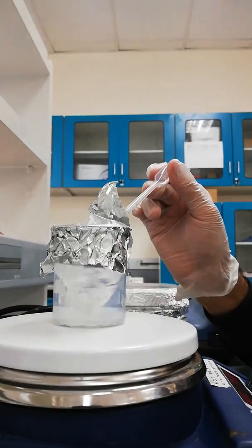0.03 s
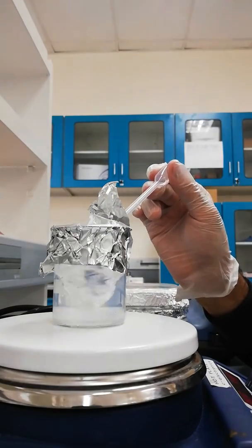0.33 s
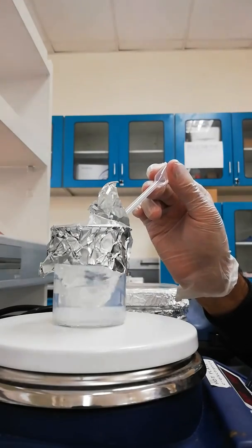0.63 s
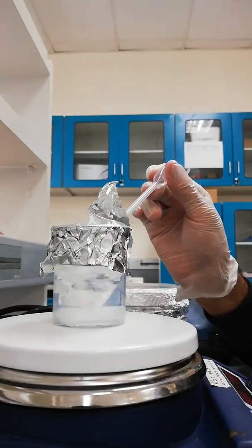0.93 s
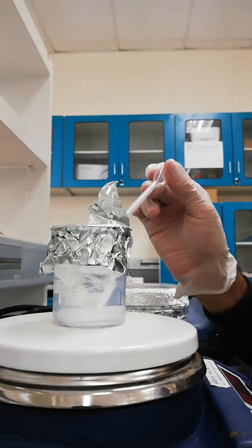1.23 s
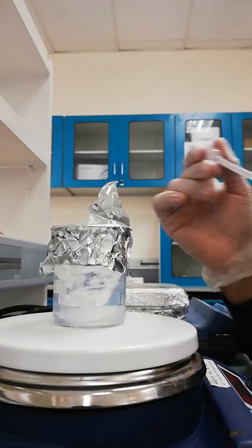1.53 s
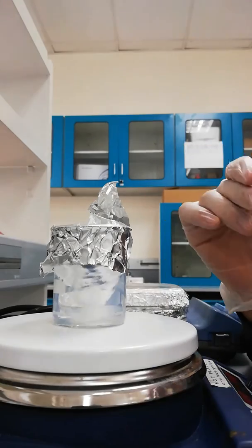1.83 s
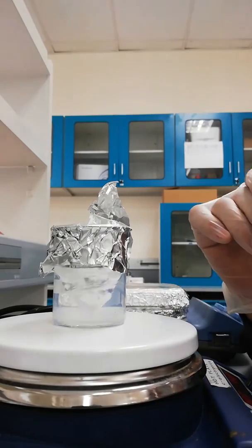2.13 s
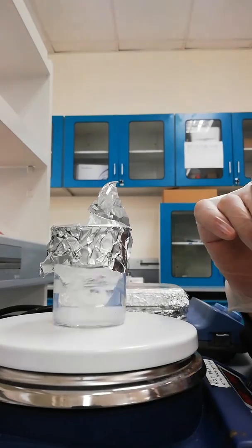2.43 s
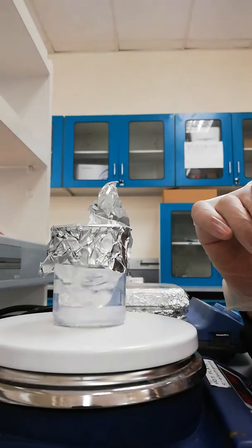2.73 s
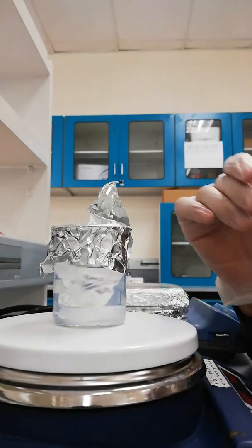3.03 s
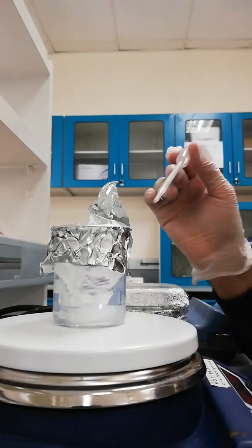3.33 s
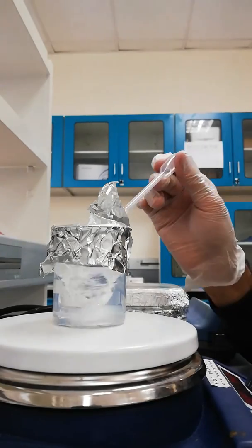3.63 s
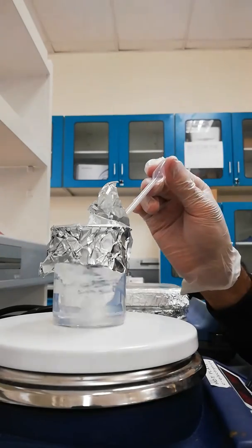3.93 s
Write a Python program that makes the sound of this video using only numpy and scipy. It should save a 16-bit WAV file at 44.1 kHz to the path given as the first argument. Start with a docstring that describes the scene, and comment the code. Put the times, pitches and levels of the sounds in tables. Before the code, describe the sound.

Plastic clicks and a lid snapping shut over steady ventilation hum in a laboratory.

```python
"""Ventilation rumbles around a laboratory bench and a hotplate stirrer whines, chopped by mains ripple.
Soft swishes of stirring and gloved hands rustle over the ventilation's steady hiss.
Close to the microphone, on the right, a plastic pipette scrapes a vial, then gloved hands twist a cap
and snap a lid: taps and stick-slip ring the plastic, and hard walls add a faint, bright tail.
Then, further off, a short puff of air hisses and dies away."""
import sys
import numpy as np
from scipy import signal
from scipy.fft import rfft, irfft
from scipy.io import wavfile
from scipy.ndimage import uniform_filter1d

SR = 44100
rng = np.random.default_rng(int(sys.argv[2]) if len(sys.argv) > 2 else 0)


def generate_wav(signal):
    """Clip the signal to [-1, 1] and save it as 16-bit WAV at the path in sys.argv[1]."""
    frames = np.transpose(np.atleast_2d(signal))
    scaled = np.clip(frames, -1, 1) * 32767
    pcm = np.round(scaled).astype(np.int16)
    wavfile.write(sys.argv[1], SR, pcm)


N = 4 * SR

# Resonances of the things in hand. Each row: frequency in Hz, width in Hz, level in dB.
PIPETTE = [(707, 77, 3), (990, 90, 2.5), (1340, 150, -3), (1512, 63, 7.5), (2910, 340, -6.5),
           (4200, 550, -12.5), (5250, 600, -12), (6060, 330, -7.5), (7200, 500, -17), (9640, 1000, -2.5),
           (10900, 800, -3), (11900, 600, -10), (14300, 2200, -17)]
STEM = [(1500, 700, -3.5), (3580, 250, -2), (8400, 1700, -9.5)]  # the pipette's thin stem
VIAL = [(1110, 990, -7.5), (2170, 130, 2), (2990, 460, -2.5), (4060, 360, -4.5), (5560, 300, -5),
        (6000, 400, -13), (7060, 390, -9), (7900, 350, -9), (9330, 550, -3), (10450, 550, -6)]
RIM = [(7310, 135, -2.5), (1340, 800, -18.5)]
HOLLOW = [(660, 90, -23), (850, 75, 3), (978, 48, 8.5), (1230, 110, -2), (1435, 89, -1)]  # the container's hollow body
CAP = [(1020, 550, -0.5), (1550, 260, -12), (3200, 146, 1.5), (4100, 670, -5), (5700, 360, 0.5),
       (6780, 690, -2.5), (7850, 460, -7), (9500, 640, 3.5), (10950, 480, 1.5), (11800, 1000, -5),
       (13700, 350, -17), (14900, 1100, -17)]
THREAD = [(650, 46, 5.5), (1040, 130, 2.5), (1320, 270, -8), (1674, 80, -2), (3100, 480, -13),
          (4250, 220, -13), (5850, 410, -14), (7060, 490, -8.5), (7900, 500, -15), (9400, 200, 1.5),
          (11000, 1300, -22), (14200, 1600, -26)]  # the cap's screw thread
LID = [(3220, 63, -3), (4400, 330, -8), (5620, 340, -3.5), (6900, 390, 1), (8300, 340, -1),
       (8750, 750, -2.5), (9100, 540, 3.5), (10600, 500, -10), (11500, 800, -8), (14400, 770, -20)]
GLOVE = [(1500, 810, -5), (3500, 3300, -0.5), (5650, 2100, -6), (7800, 1800, 0.5), (9700, 2200, 2)]
# Each entry: a thing's name, its resonances.
THINGS = {"glove": GLOVE, "pipette": PIPETTE, "stem": STEM, "vial": VIAL, "cap": CAP, "thread": THREAD,
          "lid": LID, "hollow": HOLLOW, "rim": RIM}
# Single taps. Each row: start in seconds, level in dB, body in dB, treble in dB, thing.
CLICKS = [(1.242, -28, 0, 6, "glove"), (1.2602, -23.5, 5, -3, "glove"), (1.423, -21.5, -3, 0, "stem"),
          (1.5746, -23.5, 4, -15, "glove"), (1.9124, -23, 7, -11, "glove"), (2.0093, -9, 8, 3, "pipette"),
          (2.0172, -8, -4, 2, "pipette"), (2.024, -7, -15, 20, "pipette"), (2.034, -2.5, -2, 3, "pipette"),
          (2.039, -15, -15, 8, "pipette"), (2.0616, -5, 5, 0, "rim"), (2.085, -14.5, 23, -10, "pipette"),
          (2.138, -11, 0, 5, "vial"), (2.1417, -8.5, -8, -2, "vial"), (2.1484, -12, -1, -3, "vial"),
          (2.312, -22, 1, -17, "thread"), (2.4495, -16.5, 6, -6, "thread"), (2.4728, -15, -2, -2, "thread"),
          (2.4863, -9.5, -1, 6, "thread"), (2.494, -14, 3, 2, "thread"), (2.5042, -17, -12, 16, "thread"),
          (2.5246, -0.5, -6, -2.5, "cap"), (2.5324, -6, -13, -7, "cap"), (2.547, -7, 4, 5, "cap"),
          (2.552, -7, -2, 0, "cap"), (2.5554, -4, -2, 9, "cap"), (2.559, 4.5, -21, 20, "cap"),
          (2.5629, -0.5, -8, -7, "cap"), (2.5648, 0.5, -24, 2, "cap"), (2.575, 0, -9, 10, "cap"),
          (2.579, -10, -12, -6, "cap"), (2.582, -2, -16, -2, "cap"), (2.6113, -9.5, 5, 9, "cap"),
          (2.6687, 0.5, -13, 6, "lid"), (2.6697, 3.5, 12, -3, "lid"), (2.6706, -1.5, -2, -1, "lid"),
          (2.6712, -5.5, 0, 0, "hollow"), (2.6742, -2, 0, 0, "hollow"), (2.818, -23, 0, -7, "lid"),
          (2.833, -21, -3, 0, "lid"), (2.851, -20.5, 0, 1, "lid"), (2.864, -20.5, 5, -5, "cap"),
          (3.472, -18, -19, 22, "glove"), (3.6426, -29, -20, 17, "glove")]
# Stick-slip runs. Each row: start, rise, hold and 60 dB fade in seconds, slips per second,
# level in dB, body in dB, treble in dB, thing.
SCRAPES = [(2.001, 0.019, 0.022, 0.057, 2350, -28, -1, -6, "pipette"),
           (2.049, 0.0041, 0.016, 0.064, 2600, -40, 8, -10, "pipette"),
           (2.132, 0.0023, 0.013, 0.08, 2060, -35.5, -3.5, -1, "vial"),
           (2.465, 0.0068, 0.032, 0.28, 1400, -37, 7, -1, "thread"),
           (2.509, 0.01, 0.016, 0.087, 1800, -35.5, 11, -2, "thread"),
           (2.542, 0.014, 0.005, 0.03, 1600, -34, -14, 2.5, "cap"),
           (2.574, 0.0036, 0.015, 0.082, 1500, -29, -24, 6, "cap"),
           (2.552, 0.0099, 0.054, 0.046, 1600, -41, 3, -8, "thread"),
           (2.69, 0.0088, 0.028, 0.68, 1500, -51, 0, -9, "lid")]
# Shadow on the microphone's far side. Each row: frequency in Hz, left against right in dB.
LEFT_SHADOW = [(300, -7), (1000, -13), (3000, -10.5), (4900, -13.5), (5600, -9.5), (7000, -28),
               (7900, -2.5), (9400, -31), (12000, -14), (16000, -22)]

# Colour of the puff. Each row: frequency in Hz, relative level in dB.
PUFF_SPECTRUM = [(500, -16), (1200, -18), (1480, -4), (1950, -9), (2400, -4), (3150, -2.5), (4300, -6.5),
                 (6200, -4), (8500, -1.5), (10500, -1), (12500, -13), (15500, -8)]
# Decay of the puff. Each row: frequency in Hz, seconds to fall 60 dB.
PUFF_T60 = [(1500, 1.18), (3000, 1), (6000, 0.8), (10000, 0.55), (15000, 0.22)]
# The puff sits to the right. Each row: frequency in Hz, left against right in dB.
PUFF_LEFT = [(1300, -3.5), (4400, -5.5), (8100, -7.5), (15000, -9)]

# The stirrer's whine on the right. Each row: time in seconds, level in dB.
WHINE_LEVEL = [(0, -49), (1.25, -51.5), (1.45, -47.5), (1.66, -52.5), (1.76, -45), (2.05, -41.5),
               (2.2, -40.5), (2.42, -48), (2.7, -46), (2.96, -45), (3.06, -51), (3.19, -55), (3.27, -47.5),
               (4, -50.5)]
# Its buzzing sidebands. Each row: frequency in Hz, level in dB against the median whine.
BUZZ_SPECTRUM = [(10000, -52), (10700, -51), (11200, -33), (11450, -22), (11700, -25), (11800, -34),
                 (12200, -38), (12400, -37)]

# Soft swishes of stirring and gloved hands rustling. Each row: time in seconds, treble gain in dB.
SWISHES = [(0, -0.5), (.4, -1), (.58, -3.5), (.75, 1.5), (.9, -1.5), (1.05, 4), (1.2, 0), (1.7, -1.5),
           (2.3, 0), (4, -5)]
# Colour of the ventilation. Each row: frequency in Hz, relative level in dB.
VENT_SPECTRUM = [(20, -14), (38, -3), (52, -8), (80, -2), (130, 0), (185, -6.5), (260, -10), (350, -17),
                 (480, -11.5), (570, -19), (700, -15), (1500, -22), (2600, -28), (4400, -31.5),
                 (5500, -35.5), (7200, -34), (9400, -29.5), (11300, -33)]
# Its balance. Each row: frequency in Hz, left against right in dB.
VENT_LEFT = [(30, 0.5), (230, -1), (380, -2), (560, -11), (750, -5.5), (2000, -6), (4400, -6.5), (6000, -3),
             (9400, -8.5), (12000, -13)]
# How alike its two sides are. Each row: frequency in Hz, coherence from 0 to 1.
VENT_COHERENCE = [(30, 1), (170, 0.98), (300, 0.97), (600, 0.7), (1200, 0.27), (2500, 0.075), (15000, 0.1)]
# Fan and motor tones. Each row: frequency in Hz, level on the right in dB, left against right in dB.
HUM_TONES = [(121.9, -53, 1.5), (399.7, -68, -4.5), (502, -62, -17), (598.4, -64.5, -22)]
# Decay of the room. Each row: frequency in Hz, seconds to fall 60 dB.
ROOM_T60 = [(300, 0.22), (2000, 0.33), (8000, 0.48), (15000, 0.21)]

LEFT_DELAY_S = 0.00064  # sound from the right reaches the left side this much later


def handling():
    """Close on the right, single clicks and dense runs of stick-slip ring the plastic."""
    out = np.zeros((2, N))
    for start, db, body_db, treble_db, thing in CLICKS:
        add(out, start, amp(db) * scatter(ring(thing, body_db, treble_db), thing))
    t = np.arange(SR // 4) / SR
    for start, rise, hold, fade, rate, db, body_db, treble_db, thing in SCRAPES:
        slips = (rng.random(len(t)) < rate / SR) * rng.choice([-1, 1], len(t))
        slips = slips * amp(5.5 * rng.uniform(-0.63, 1, len(t)))  # uneven in strength
        pressure = np.minimum(t / rise, 1) * amp(-60 * np.maximum(t - rise - hold, 0) / fade)
        force = unit(slips) * pressure
        scrape = signal.fftconvolve(force[None], ring(thing, body_db, treble_db), axes=1)
        add(out, start, amp(db) * scatter(scrape, thing))
    return out


def ring(thing, body_db, treble_db):
    """A thing's answer to one tap, left and right; the place of contact weights body and treble."""
    hz = np.fft.rfftfreq(4096, 1 / SR)
    power = 0
    for centre, width, db in THINGS[thing]:
        peak = amp(db) ** 2 / (1 + (2 * (hz - centre) / width) ** 2) ** 1.195
        power += peak * below(hz, centre + 2200, slope=20)
    body = below(hz, 1880, slope=8)
    treble = 1 - below(hz, 8300, slope=8)
    bass_cut = 1 - below(hz, 570, slope=4)
    gain = np.sqrt(power) * amp(body_db * body + treble_db * treble) * bass_cut
    left = minimum_phase(gain * amp(curve(LEFT_SHADOW, hz)))
    right = minimum_phase(gain)
    return np.array([left, right]) / np.linalg.norm(right)


def scatter(sound, thing, t60_s=0.039, above_hz=1590):
    """Hand and bench scatter the treble; the left side hears it later and mostly indirectly."""
    left_db = 26  # scattered against direct sound, as is right_db
    right_db, delay_s = (-3, 0.00005) if thing == "lid" else (4, LEFT_DELAY_S)
    t = np.arange(2048) / SR
    echoes = rng.standard_normal((2, len(t))) * amp(-60 * t / t60_s)
    echoes = signal.sosfilt(signal.butter(2, above_hz, "high", fs=SR, output="sos"), echoes)
    echoes *= amp([[left_db], [right_db]]) / np.linalg.norm(echoes, axis=1, keepdims=True)
    direct = np.zeros_like(echoes)
    direct[0, round(delay_s * SR)] = direct[1, 0] = 1
    size = np.linalg.norm(echoes + direct, axis=1, keepdims=True)
    bass = signal.sosfilt(signal.butter(1, above_hz, fs=SR, output="sos"), direct)
    paths = (echoes + direct) / size + (1 - 1 / size) * bass  # the bass arrives whole
    return signal.fftconvolve(sound, paths, axes=1)


def air_puff(start_s=3.111, rise_s=0.027, level_db=-28.5):
    """Further from the microphone, air bursts out and dies away, the treble first."""
    left = dying_noise(PUFF_T60, lambda hz: curve(PUFF_SPECTRUM, hz) + curve(PUFF_LEFT, hz))
    right = dying_noise(PUFF_T60, lambda hz: curve(PUFF_SPECTRUM, hz))
    burst = np.array([left, right]) / right[:SR // 20].std()
    attack = np.minimum(np.arange(SR) / SR / rise_s, 1)
    out = np.zeros((2, N))
    add(out, start_s, amp(level_db) * burst * attack)
    return out


def stirrer_whine(pitch_hz=12000, ripple_hz=100, ripple_depth=0.77, left_db=-66):
    """The stirrer's drive sings on the right, throbbing with mains ripple, a thin tick in each trough."""
    t = np.arange(N) / SR
    ripple = 1 + ripple_depth * np.cos(2 * np.pi * ripple_hz * t)
    tone = ripple * np.cos(2 * np.pi * pitch_hz * t + [[np.pi / 2], [0]])
    sidebands = [pitch_hz + k * ripple_hz for k in range(-20, 5) if abs(k) > 1]
    trough_t = t + 0.5 / ripple_hz
    buzz = sum(amp(curve(BUZZ_SPECTRUM, hz)) * np.sin(2 * np.pi * hz * trough_t) for hz in sidebands)
    level_db = np.array([np.full(N, left_db), np.interp(t, *np.transpose(WHINE_LEVEL))])
    return amp(level_db) * unit(tone) + amp(np.median(level_db, axis=1, keepdims=True)) * buzz


def ventilation_and_swishes(level_db=-43.5, swish_hz=5140, low_hz=31.3, top_hz=12450):
    """Stirring and gloved hands swish softly over the ventilation's centred rumble and steady hiss."""
    hz = np.fft.rfftfreq(4096, 1 / SR)[:, None]
    frames = N // 1024 + 3
    a, b, c, d, patches = rng.standard_normal((frames, len(hz), 5)).T
    right, diffuse = a + 1j * b, c + 1j * d
    coherence = curve(VENT_COHERENCE, hz)
    delay = np.exp(-2j * np.pi * hz * LEFT_DELAY_S * (hz > 300))
    left = coherence * right * delay + np.sqrt(1 - coherence ** 2) * diffuse
    left *= amp(curve(VENT_LEFT, hz))
    patches = uniform_filter1d(patches, size=4, axis=1)
    flicker_db = 0.5 * unit(uniform_filter1d(patches, size=30, axis=0))
    swish_band = 1 - below(hz, swish_hz, slope=6)
    swish_db = swish_band * np.interp(np.arange(frames) * 1024 / SR, *np.transpose(SWISHES))
    gain = amp(curve(VENT_SPECTRUM, hz) + flicker_db + swish_db) * below(hz, top_hz, slope=60)
    air = signal.istft(np.array([left, right]) * gain, nperseg=4096, noverlap=3072)[1][:, :N]
    low_cut = signal.butter(4, low_hz, "high", fs=SR, output="sos")
    return amp(level_db) * unit(signal.sosfilt(low_cut, air))


def fan_hum(waver_depth=0.8, waver_hz=5.4):
    """In the background, the tones of fans and motors waver in level and phase."""
    t = np.arange(N) / SR
    out = np.zeros((2, N))
    for hz, db, left_db in HUM_TONES:
        waver = 1 + waver_depth * (drift(waver_hz) + 1j * drift(waver_hz))
        tone = (waver * np.exp(2j * np.pi * hz * t)).real
        out += amp([[db + left_db], [db]]) * unit(tone)
    return out


def room_tail(sound, left_db=-21.5, right_db=-13, blur_hz=446):
    """The hard walls give a faint, bright tail, diffuse enough to blur the rings."""
    tails = np.array([dying_noise(ROOM_T60, np.zeros_like) for _ in range(2)])
    tails *= amp([[left_db], [right_db]]) / np.linalg.norm(tails[1])
    blur_phase = 2 * np.pi * np.cumsum(blur_hz * drift(298)) / SR
    blurred = sound * np.sqrt(2) * np.cos(blur_phase)
    return signal.fftconvolve(blurred[None], tails, axes=1)[:, :N]


def dying_noise(t60, colour_db):
    """One second of noise whose bands each die at their own speed."""
    hz, t, bands = signal.stft(rng.standard_normal(SR), SR, nperseg=256)
    decay = amp(-60 * t / curve(t60, hz)[:, None])
    return signal.istft(bands * decay * amp(colour_db(hz))[:, None], SR)[1][:SR]


def minimum_phase(gain):
    """The shortest causal ring with this spectrum."""
    cepstrum = irfft(np.log(np.maximum(gain, 1e-5)))
    half = len(cepstrum) // 2
    folded = np.r_[cepstrum[0], 2 * cepstrum[1:half], np.zeros(half)]
    return irfft(np.exp(rfft(folded)))


def drift(rate_hz):
    """A random wander of rms 1, mostly slower than rate_hz."""
    hz = np.fft.rfftfreq(N, 1 / SR)
    smoothing = np.exp(-(hz / rate_hz) ** 2) * (hz > 0)
    return unit(irfft(rfft(rng.standard_normal(N)) * smoothing, N))


def below(hz, corner_hz, slope):
    """A weight that falls from 1 to 0 around the corner."""
    return 1 / (1 + (hz / corner_hz) ** slope)


def curve(points, hz):
    """A table's value at hz, interpolated over log frequency."""
    point_hz, value = np.transpose(points)
    return np.interp(np.log(hz + 1), np.log(point_hz + 1), value)


def amp(db):
    return 10 ** (np.asarray(db) / 20)


def unit(x):
    return x / np.sqrt(np.mean(x ** 2) + 1e-20)


def add(mix, start_s, sound):
    part = mix[..., round(start_s * SR):][..., :sound.shape[-1]]
    part += sound[..., :part.shape[-1]]


def scene():
    """The bench in stereo: hands close by, the puff further off, machines throughout."""
    close = handling()
    events = close + room_tail(close[1]) + air_puff()
    return events + ventilation_and_swishes() + fan_hum() + stirrer_whine()


def record(dry):
    """The microphone chain cuts off steeply at 15850 Hz."""
    lowpass = signal.firwin(511, 15850, window=("kaiser", 9), fs=SR)
    return signal.oaconvolve(dry, lowpass[None], "same")


dry = scene()
out = record(dry)
generate_wav(out)
```